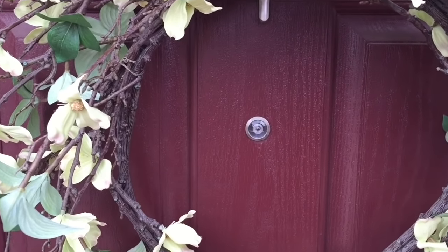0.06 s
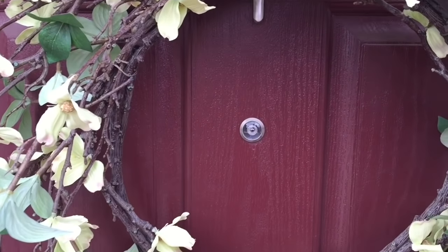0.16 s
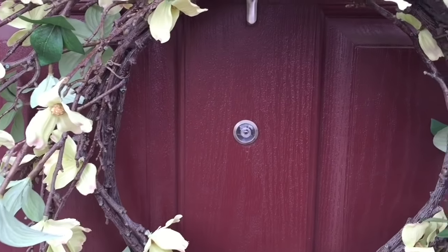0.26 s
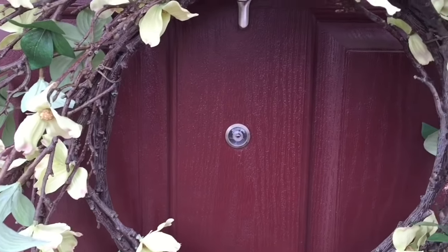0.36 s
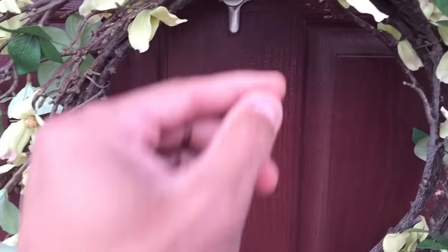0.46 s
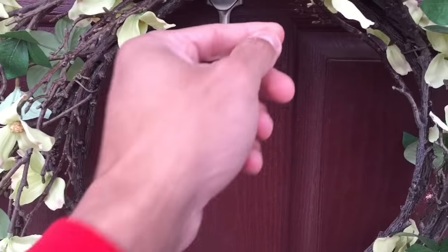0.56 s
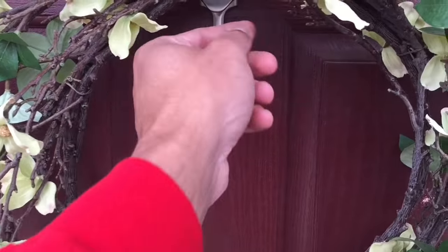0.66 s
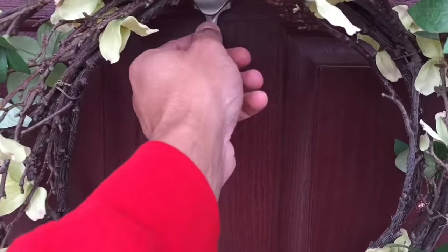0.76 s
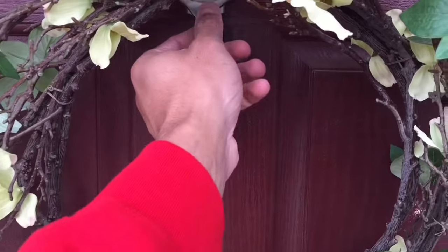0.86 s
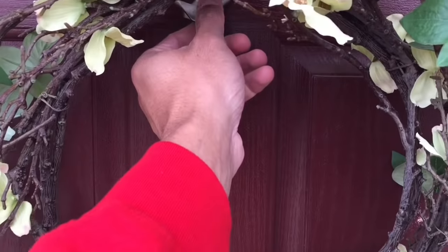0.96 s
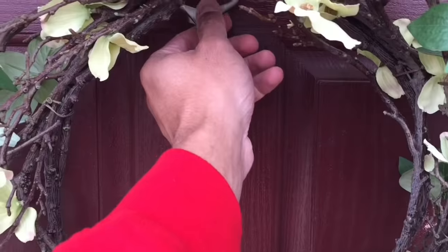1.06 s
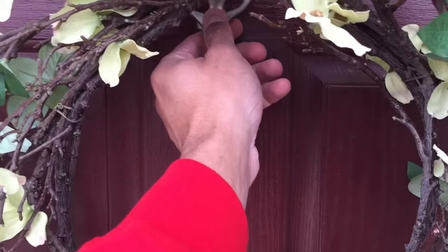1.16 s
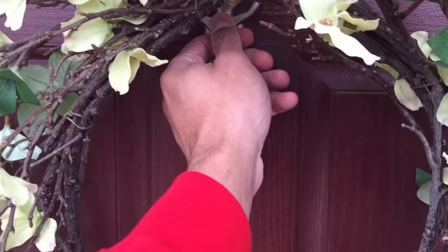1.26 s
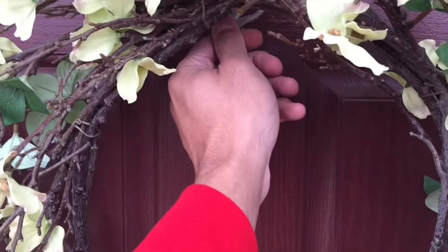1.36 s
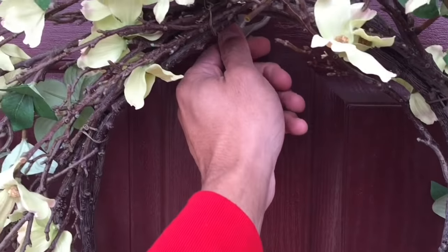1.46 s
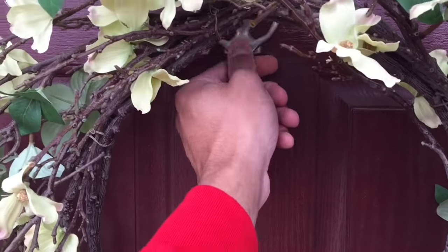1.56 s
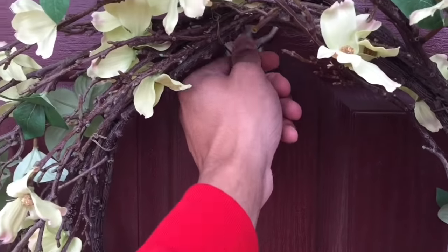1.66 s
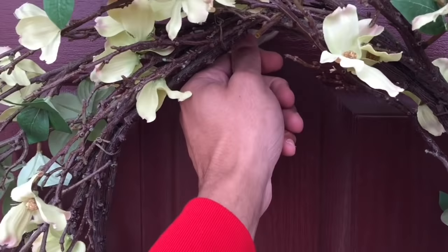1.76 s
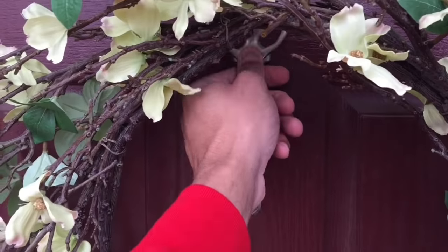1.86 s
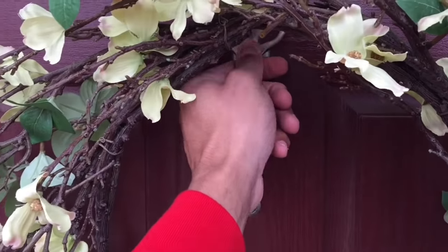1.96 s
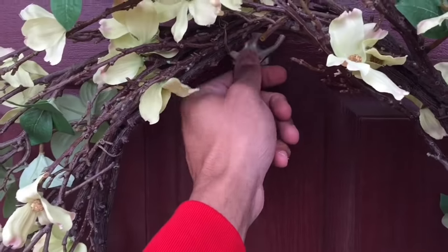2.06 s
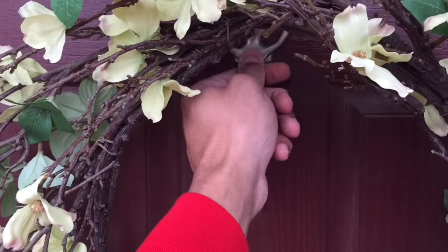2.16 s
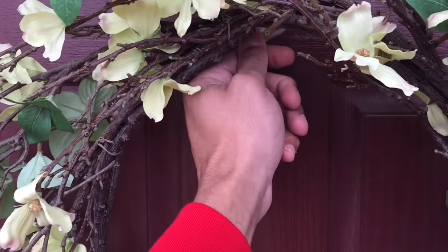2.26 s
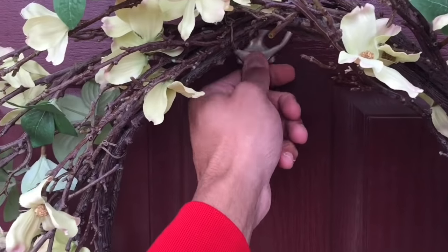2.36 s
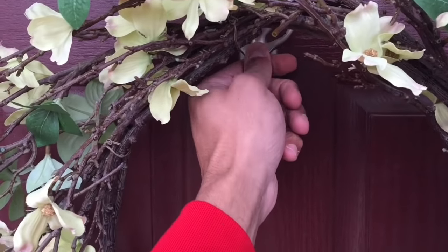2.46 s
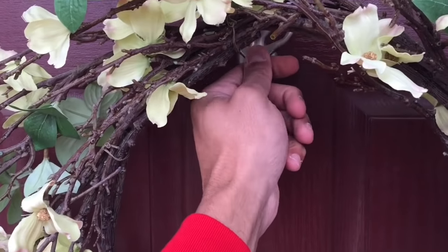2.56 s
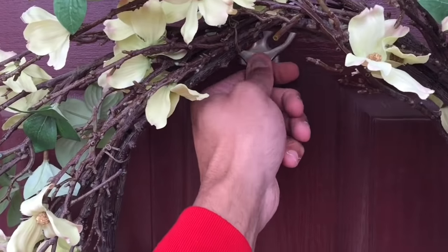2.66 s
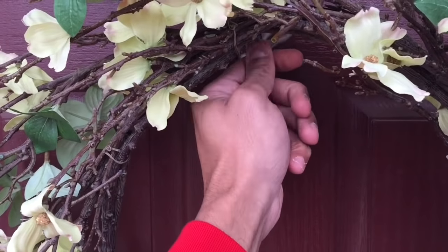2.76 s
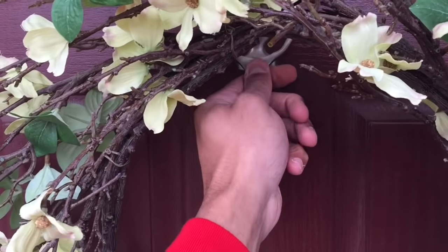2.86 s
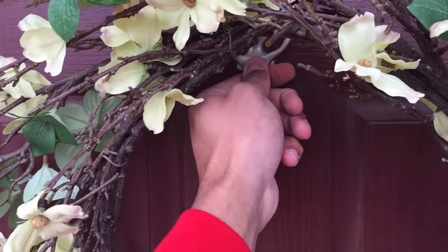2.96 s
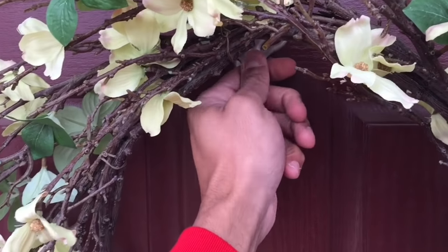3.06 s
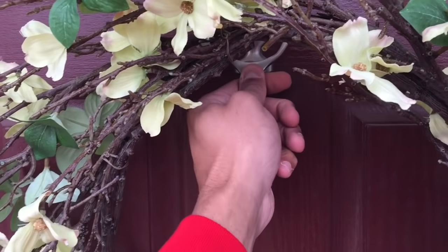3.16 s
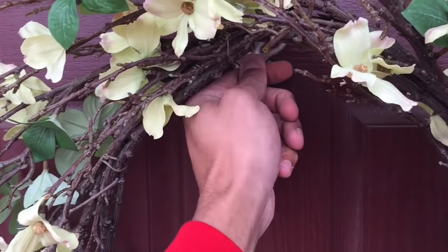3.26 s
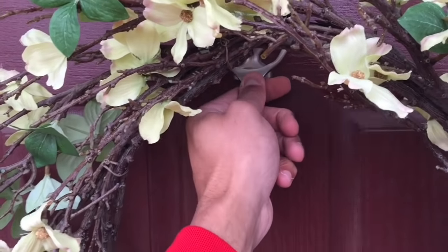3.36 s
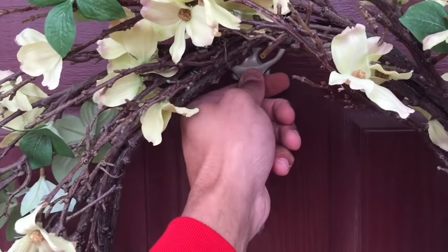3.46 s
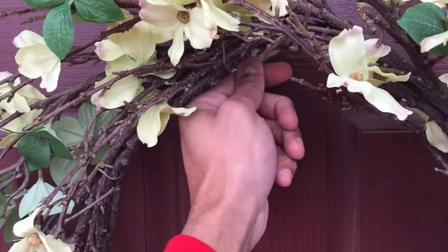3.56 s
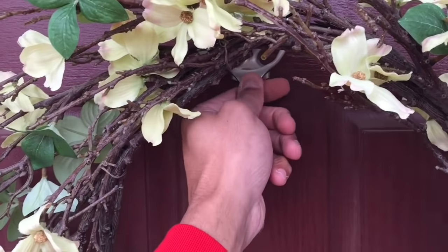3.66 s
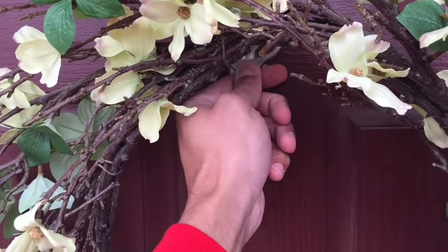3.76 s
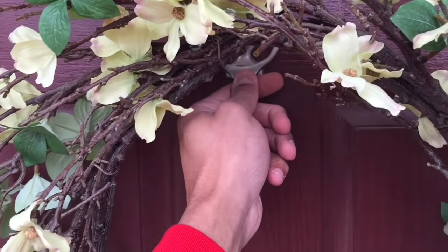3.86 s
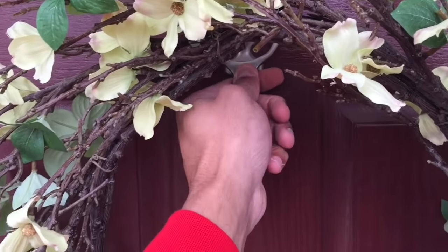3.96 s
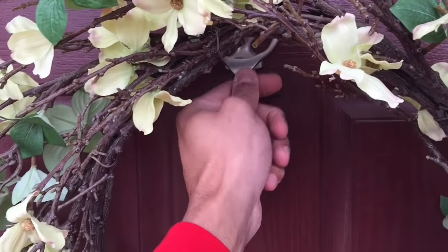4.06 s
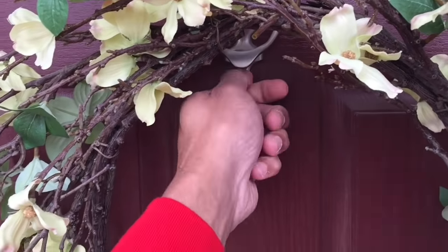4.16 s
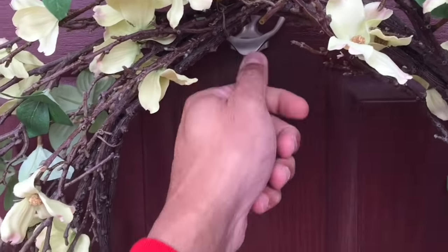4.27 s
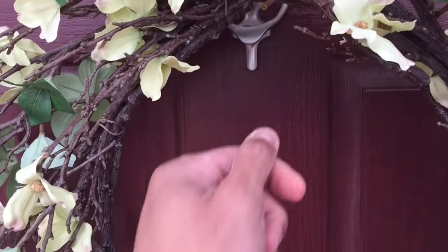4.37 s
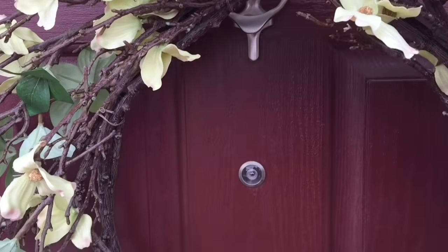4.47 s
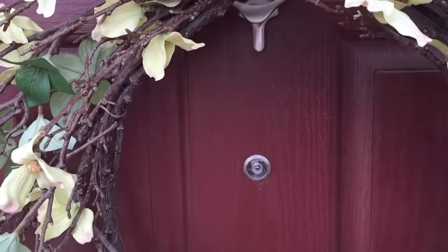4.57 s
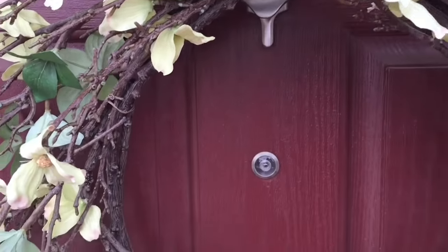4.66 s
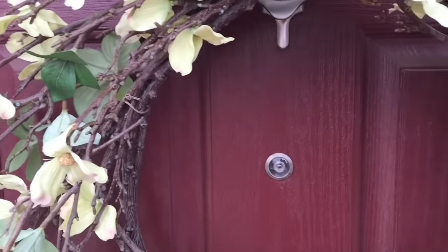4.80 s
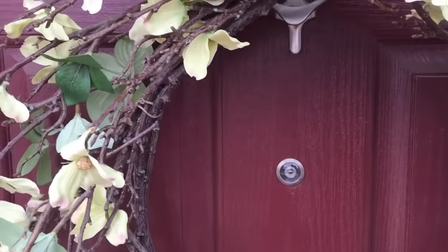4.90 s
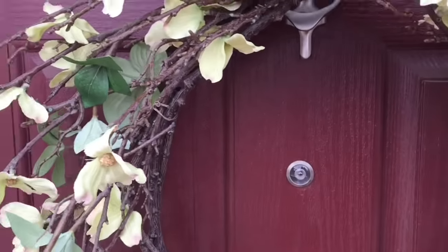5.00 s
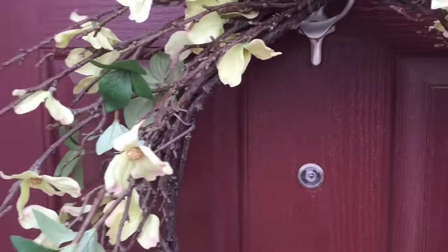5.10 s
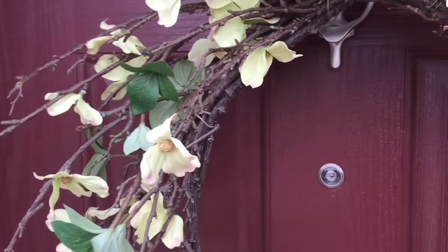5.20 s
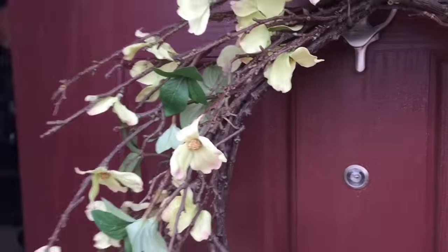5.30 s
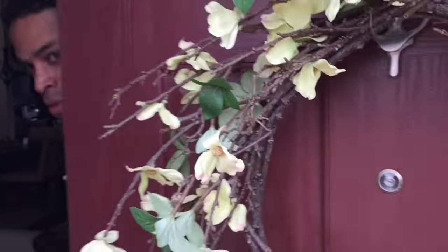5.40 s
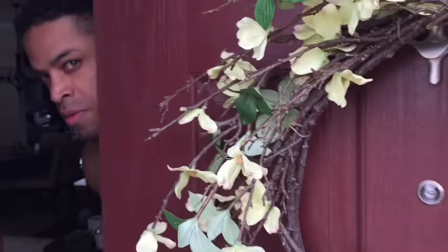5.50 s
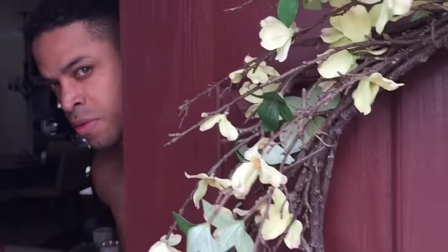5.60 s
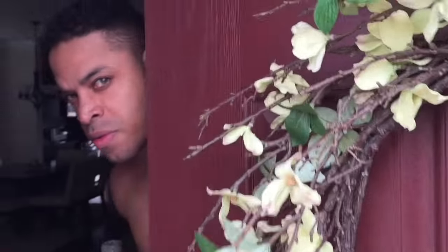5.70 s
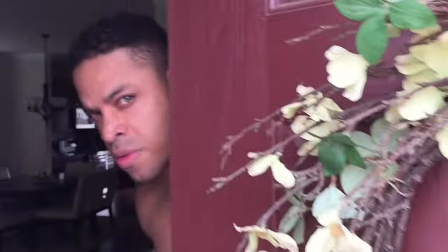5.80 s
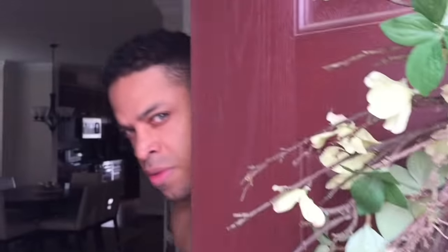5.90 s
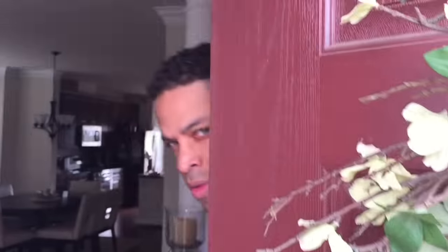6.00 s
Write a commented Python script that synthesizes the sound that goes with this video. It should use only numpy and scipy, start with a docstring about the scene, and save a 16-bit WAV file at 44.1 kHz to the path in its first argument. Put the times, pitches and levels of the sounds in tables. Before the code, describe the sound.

Very near microphone, dry porch sound. Soft low street hum and faint bumps come first, then light metal touches and a steady rush of loud knocker blows, about four a second, bright cracks over a hollow door body, the hardest slightly flattened by overload. They stop; handle and latch click, the door unsticks with a grainy rustle, and two wavering hinge squeaks end it.

```python
"""At a front door, close up: a small metal knocker is rapped fast, hard blows with bounces and arm rattle.
Then the door opens: latch clicks, a peeling seal, a shaking twig wreath and a squeaking hinge.
A distant street hums under it all. Blows ring tuned metal and door modes under a noise crack; rustle is
grainy noise, squeaks are wavering sines, bumps are low narrow noise and the street is shaped noise.
The hardest blows overload: they flatten against a soft ceiling."""
import sys
import numpy as np
from scipy import signal
from scipy.io import wavfile
from scipy.ndimage import uniform_filter1d

SR = 44100
rng = np.random.default_rng(int(sys.argv[2]) if len(sys.argv) > 2 else 0)


def file_out(sig):
    """Save sig as 16-bit WAV at sys.argv[1]."""
    # one column per channel
    cols = np.atleast_2d(sig).T
    # limit, then scale
    lim = np.clip(cols, -1, 1)
    pcm = np.round(lim * 32767).astype(np.int16)
    wavfile.write(sys.argv[1], SR, pcm)


N = 266364
EDGE_HZ = 16000  # upper band limit of the scene
SOFT_START = .2  # chatter swells in with this share of its time
FIRM_CHATTER_S, LOOSE_CHATTER_S = 0.00085, 0.0039


def amp(db):
    """Turns dB into a linear gain; amp(2 * db) is the matching power."""
    return 10 ** (np.asarray(db) / 20)


def evened(x):
    """Scales a signal to rms 1."""
    return x / np.sqrt(np.mean(x ** 2) + 1e-20)


def read(points, hz):
    """Reads a (frequency, value) curve along a log frequency axis."""
    f, value = np.transpose(points)
    return np.interp(np.log(hz + 1), np.log(f + 1), value)


def add(mix, s, sound):
    """Lays a sound into the mix at s seconds, cut at the end of the mix."""
    part = mix[round(s * SR):][:len(sound)]
    part += sound[:len(part)]


def noise(length, size, field_db):
    """Noise from random short-time spectra whose level is field_db(Hz, s)."""
    hop = size // 4
    hz = np.fft.rfftfreq(size, 1 / SR)[:, None]
    t = np.arange(length // hop + 5) * hop / SR
    a, b = rng.standard_normal((len(t), len(hz), 2)).T
    spectra = (a + 1j * b) * amp(field_db(hz, t))
    return signal.istft(spectra, nperseg=size, noverlap=size - hop)[1][:length]


def modes(table):
    """Half a second of dying sines, one per (Hz, dB, t60 s) row."""
    t = np.arange(SR // 2) / SR
    return sum(amp(db - 60 * t / t60) * np.sin(2 * np.pi * hz * t) for hz, db, t60 in table)


def unit(response):
    """Scales a response to rms 1 over its first 8 ms."""
    return response / np.sqrt(np.mean(response[:350] ** 2))


def band(x, lo_hz, hi_hz):
    """Keeps the band between two frequencies."""
    return signal.sosfilt(signal.butter(2, [lo_hz, hi_hz], "bandpass", fs=SR, output="sos"), x)


# background: distant street and hiss, as (frequency [Hz], relative level [dB per Hz])
STREET = [(15, -49.5), (25, -25.5), (76, 7), (117, -18), (212, -6.5), (242, -17.5), (309, -6), (463, -19.5),
          (545, -17), (714, -13.5), (818, -16), (1160, -15), (1260, -17), (2610, -38), (16000, -55)]
STREET_DB = -46  # overall rms


def street():
    """Distant traffic and microphone hiss: steady coloured noise in faint drifting patches."""
    grid = rng.standard_normal((N // 512 + 5, 1025))
    smooth_in_time = uniform_filter1d(grid, 10, 0)
    patchy_db = 1.6 * evened(uniform_filter1d(smooth_in_time, 8, 1)).T
    hum = noise(N, size=2048, field_db=lambda hz, t: read(STREET, hz) + patchy_db)
    return amp(STREET_DB) * evened(hum)


# low bumps of hand and door, as (time at full swell [s], level [dB], centre [Hz], t60 [s])
BUMPS = [(.56, -43.5, 101.5, 0.71), (.73, -37.5, 98, 0.54), (.854, -29.5, 141, 0.16),
         (1.219, -46, 111, 0.34), (1.289, -40, 85.5, 0.14), (1.67, -24.5, 138.8, 0.33),
         (1.976, -23, 166.1, 0.38), (2.225, -21.5, 147.6, 0.27), (2.484, -30, 187.7, 0.34),
         (2.641, -32.5, 101, 0.27), (2.8, -35, 200.6, 0.27), (2.961, -28, 108, .15),
         (3.019, -21, 155, 0.24), (3.275, -23.5, 184.6, 0.32), (3.51, -25, 184.3, 0.42),
         (3.79, -33, 190.2, 0.45), (4.015, -21.5, 154.6, 0.32), (4.22, -16, 129.6, 0.24),
         (4.334, -16.5, 84.3, 0.24), (4.525, -30, 107, 0.17), (4.681, -29, 193.5, 0.23),
         (4.801, -42, 91.3, .8), (4.95, -24, 72, .4), (5.529, -38.5, 97, 0.64), (5.59, -27, 200, .2),
         (5.65, -29, 150, .3), (5.735, -32.5, 154.8, 0.31), (5.95, -33, 188.7, 0.78)]
BUMP_RISE_S = 0.0151


def bumps():
    """A broad low resonance, shaken at random: a quick swell, then a dying rumble."""
    out, t = np.zeros(N), np.arange(SR // 2) / SR
    shakes = rng.standard_normal((len(BUMPS), 2, len(t)))
    for (s, db, hz, t60), shake in zip(BUMPS, shakes):
        # two smoothing stages keep the shake close around the centre
        for width_hz in (80, 160):
            shake = signal.lfilter([1], [1, -np.exp(-np.pi * width_hz / SR)], shake)
        a, b = shake
        rumble = evened(a * np.cos(2 * np.pi * hz * t) + b * np.sin(2 * np.pi * hz * t))
        rise = np.minimum(t / BUMP_RISE_S, 1) ** 2
        fall = amp(db - 60 * np.maximum(t - BUMP_RISE_S, 0) / t60)
        add(out, s - BUMP_RISE_S, rise * fall * rumble)
    return out


# short gliding squeak strands, one of them an octave above the hinge squeak, as
# (start time [s], length [s], first pitch [Hz], last pitch [Hz], level [dB])
PEEPS = [(5.44, .08, 1900, 1880, -55), (5.59, 0.059, 1890, 1900, -37), (5.655, .03, 1200, 1100, -38),
         (5.642, .12, 2670, 2650, -49), (5.715, .03, 1900, 1880, -49), (5.755, 0.067, 4400, 4000, -49),
         (5.76, .06, 1750, 1600, -50)]


def peep(start, length, first_hz, last_hz, db):
    """A brief gliding squeak strand beside the long ones, wavering in pitch and flickering in level."""
    count = round(length * SR)
    waver, flutter = (evened(uniform_filter1d(v, size=220)) for v in rng.standard_normal((2, count)))
    glide_hz = np.linspace(first_hz, last_hz, count)
    turn = 2 * np.pi * np.cumsum(glide_hz * (1 + .007 * waver)) / SR
    return start, amp(db + 2.9 * flutter) * np.sin(turn) * np.hanning(count)


# two long hinge squeaks, each as (time [s], slip rate [Hz], level [dB], overtone level [dB])
SQUEAKS = [
    [(5.455, 2665, -54, -76), (5.49, 2606, -45.5, -70), (5.52, 2510, -36, -68), (5.56, 2500, -41, -66),
     (5.6, 2444, -36, -64), (5.68, 2470, -48, -54), (5.71, 2450, -34, -57), (5.73, 2400, -33, -54)],
    [(5.77, 2625, -42, -76), (5.79, 2452, -39.5, -72), (5.815, 2320, -37.5, -62), (5.84, 2195, -55, -60),
     (5.86, 2145, -47, -64), (5.89, 2150, -44, -61), (5.92, 2124, -51, -61), (5.94, 2170, -37, -58)],
]
# multiples 2 to 5 of the slip rate, as (relative level [dB])
OVERTONES_DB = [0, -5, -15, -9]
# multiples 1, 2 and 4 of a third of the slip rate, as (relative level [dB])
THIRDS_DB = [1, -8, -12]
THIRD_DB = -51.  # steady fader for the thirds while the slip tone moves
THIRD_HZ, THIRD_DB_PER_HZ = 2350, 2  # above this rate the thirds fade out, this steeply


def squeak(rows):
    """Fast, uneven stick-slip in the hinge pin; at slower rates every third slip is stronger."""
    s, *columns = np.transpose(rows)
    t = np.arange(s[0], s[-1], 1 / SR)
    hz, db, over_db = (np.interp(t, s, c) for c in columns)
    waver, flutter, catch = (evened(uniform_filter1d(v, size=220)) for v in rng.standard_normal((3, len(t))))
    turn = 2 * np.pi * np.cumsum(hz * (1 + .007 * waver)) / SR
    # a slower slip is softer: its upper overtones fade
    softening_db = np.maximum(2400 - hz, 0) / 15
    over = np.zeros(len(t))
    for k, d in enumerate(OVERTONES_DB):
        multiple = k + 2
        over += amp(d - k * softening_db) * np.sin(multiple * turn) * (hz * multiple < EDGE_HZ)
    thirds = sum(amp(d) * np.sin(2 ** k * turn / 3) for k, d in enumerate(THIRDS_DB))
    third_db = THIRD_DB - THIRD_DB_PER_HZ * np.maximum(hz - THIRD_HZ, 0)
    tone = amp(db) * np.sin(turn)
    tone += amp(over_db + 2.5 * catch) * over
    tone += amp(third_db) * thirds
    return s[0], np.sqrt(2) * amp(2.16 * flutter) * tone * signal.windows.tukey(len(t), .15)


RING_SLOPE = .85  # dB of metal ring per dB of blow: light contacts ring more than they crack


def forces(table):
    """Each contact is a first click and a burst of chatter, felt by the metal and, by its share, the door."""
    chattering, pushing, t = np.zeros(N), np.zeros(N), np.arange(SR // 30) / SR
    grits = rng.standard_normal((len(table), len(t)))
    for (s, db, push_db, _, chatter), grit in zip(table, grits):
        fading = np.exp(-t / chatter) * (1 - np.exp(-t / (SOFT_START * chatter)))
        burst = 0.84 * grit * fading / np.linalg.norm(fading)
        burst[0] += FIRM_CHATTER_S / chatter  # shorter chatter, stronger first click
        add(chattering, s, amp(RING_SLOPE * db) * burst)
        add(pushing, s, amp(db + push_db) * burst)
    return chattering, pushing


def ticks(table, sharp):
    """The first instant of a clean contact is a bright noise tick; long chatter hides it."""
    out, t = np.zeros(N), np.arange(SR // 300) / SR
    grits = rng.standard_normal((len(table), len(t)))
    for (s, db, _, treble_db, chatter), grit in zip(table, grits):
        clean = sharp / (sharp + chatter)
        add(out, s, amp(db + .8 * treble_db) * clean ** 2 * grit * np.exp(-t / 0.00045))
    return band(out, 1700, 22000)


# dying speed of dense modes and porch before the per-source scaling, as (frequency [Hz], base t60 [s])
DYING = [(100, 0.35), (260, 0.34), (700, 0.15), (1840, 0.099), (4850, 0.057), (12800, 0.065)]


def dense(hz, t, table, colour, hurry, porch_db):
    """Level of modes too close to tell apart: each band dies at its own speed, then the porch echoes on."""
    power = np.full((len(hz), len(t)), 1e-30)
    low = 1 / (1 + (hz / 1000) ** 4)
    height = np.clip(np.log2((hz + 1) / 2400) / 2.16, .12, 1.3)  # how fully the treble setting bites
    t60 = read(DYING, hz)
    for s, db, push_db, treble_db, chatter in table:
        window = (t >= s) & (t < s + .3)
        after = t[window] - s
        fall_db = 60 * after / t60
        held_db = np.maximum(fall_db - 60 * chatter / t60, 0)  # chatter keeps the modes fed
        share = low * amp(2 * push_db) + (1 - low) * amp(2 * treble_db * height)  # soft contacts are dull
        direct = amp(-2 * hurry * held_db)
        porch = amp(2 * (porch_db - 0.41 * fall_db))
        swell = 1 - np.exp(-(after + .0003) / (SOFT_START * chatter + 1e-5))
        power[:, window] += amp(2 * (db + read(colour, hz))) * share * (direct + porch) * swell
    return 10 * np.log10(power)


# handle, latch, seal and twigs, as (time [s], relative click level [dB], lows re click [dB],
# treble re click before weighting [dB], chatter time [s])
LATCH = [(4.4732, -39, -9, -27, 0.0034), (4.491, -38, -8, -28, 0.0043), (4.5033, -27, -6, -25, 0.0045),
         (4.6633, -22, 9.5, -8, 0.0075), (4.7633, -43, -8, -33, 0.0044), (4.809, -39.5, -8, -27, 0.005),
         (4.9386, -29, 2, 6.5, 0.0036), (4.949, -25.5, -19, -15, 0.004), (4.959, -28.5, -19, 4, 0.0005),
         (4.967, -28, -15, 3, 0.00044), (5.004, -22.5, -4, -13, 0.00081), (5.0657, -27.5, 8.5, 4, 0.0021),
         (5.074, -32.5, -8, 6, 0.003), (5.0886, -38, -2, -6, 0.004), (5.126, -35.5, 8, -13, 0.00061),
         (5.1633, -27.5, -2, -15, 0.0034), (5.225, -40.5, -5.5, -18.5, 0.004),
         (5.355, -37.5, -2, -17, 0.0051), (5.485, -40, -15, -28, 0.0052), (5.589, -28, 1.5, -16, 0.00057),
         (5.645, -44, 5, 7.5, 0.004), (5.667, -30, 3, -25, 0.005), (5.747, -32.5, -13, -13.5, 0.006),
         (5.967, -38, 0, -26, 0.0043)]
# tone of the clicks, as (frequency [Hz], relative level [dB per Hz])
LATCH_COLOUR = [(60, -32), (200, -6.5), (600, 10), (1200, -4), (2300, 4.5), (4000, -4), (8000, -7.5),
                (16000, -17)]
CLICK_DB = -11.5
# rustle bursts of seal and wreath, as (start time [s], hold [s], level [dB], treble re level [dB])
RUSTLE = [(4.948, 0.066, -34.5, -5), (5.071, 0.052, -36, -12.5), (5.325, 0.034, -48, -12.5),
          (5.589, 0.021, -35.5, -13), (5.661, .012, -37, -18.5), (5.748, 0.012, -42, -17),
          (5.802, 0.26, -53, -12), (5.2, .8, -64, -3)]
RUSTLE_RISE_DB_PER_S, RUSTLE_FALL_DB_PER_S = 700., 249


def opening():
    """Dry clicks of handle, latch and twigs nudge the door leaf, over a grainy rustle of seal and wreath."""
    clicks = noise(N, size=128, field_db=lambda hz, t: dense(hz, t, LATCH, LATCH_COLOUR, 1.5, -18.))
    _, pushing = forces(LATCH)
    body = signal.oaconvolve(pushing, unit(modes(DOOR)))[:N]
    # about 300 random grains a second stand out of a fine hiss
    sizes = rng.exponential(1, N) * (rng.random(N) < 300 / SR)
    grains = rng.standard_normal(N) * (1 + 35. * uniform_filter1d(sizes, size=60))
    s, hold, level_db, treble_db = np.transpose(RUSTLE)[:, :, None]
    t = np.arange(N) / SR
    rise_db = RUSTLE_RISE_DB_PER_S * np.maximum(s - t, 0)
    fall_db = RUSTLE_FALL_DB_PER_S * np.maximum(t - s - hold, 0)
    level = amp(level_db - rise_db - fall_db)
    treble = (level * amp(treble_db)).sum(0)
    rustle = level.sum(0) * evened(band(grains, 170, 2700))
    rustle += treble * evened(band(grains, 3000, 13000))
    return amp(CLICK_DB) * clicks + amp(-14.) * body + rustle


# the loose arm rubbing and buzzing under the fingers, as (time [s], level [dB])
FIDGET = [(1.3, -75), (1.7, -66), (1.95, -47.5), (2.15, -61), (2.5, -51), (3.2, -61), (3.55, -51),
          (4.2, -48.5), (4.449, -61), (4.95, -64.5)]


def fidget():
    """Grainy rubbing that keeps the knocker's modes faintly alive between contacts."""
    s, db = np.transpose(FIDGET)
    unevenness = evened(uniform_filter1d(rng.standard_normal(N), size=200))
    grains = rng.standard_normal(N) * amp(6.2 * unevenness)
    ringing = evened(signal.oaconvolve(grains, modes(METAL))[:N])
    rubbing = evened(band(band(grains, 1300, 3000), 1200, 3100))
    level_db = np.interp(np.arange(N) / SR, s, db, left=-120, right=-120)
    return amp(level_db) * (ringing + 0.59 * rubbing)


# contacts of the knocker, as (time [s], relative blow level [dB], push into the door re blow [dB],
# treble re blow before weighting [dB])
KNOCKS = [(1.437, -24.5, -8, -33), (1.457, -30, -13, -43), (1.5478, -38.5, -2.5, -44),
          (1.6489, -13.5, -7.5, -6), (1.6654, -5.5, -8.5, -5), (1.7497, -17, -9.5, -7),
          (1.8569, -27, -11, -24), (1.9008, -25, -6.5, -35), (1.922, -17.5, -4.5, -13.5),
          (1.9719, -1, -8.5, -2), (2.037, -21, -22, -9), (2.0619, -28, -3, -31), (2.1928, -30.5, -5, -38),
          (2.2058, -18.5, -17, -17), (2.2217, -0.5, -9, -5), (2.3213, -20.5, -4.5, -6),
          (2.3324, -19.5, -6, -37), (2.3968, -37.5, -1, -13), (2.4052, -28.5, -8, -24),
          (2.4487, -30, -3.5, -19.5), (2.4812, -0.5, -9, -5), (2.5669, -23, -3, -6.5),
          (2.572, -17.5, -16.5, -32), (2.659, -20.5, -29, -10), (2.725, -19.5, -16, -14.5),
          (2.7385, 0, -12.5, -5.5), (2.809, -19.5, -6, -13), (2.9142, -18.5, -19, -8.5),
          (2.9522, -34, -2.5, -25), (2.981, -18.5, -11.5, -13), (3.0162, -2.5, -9.5, -3),
          (3.1009, -29.5, -5, -14.5), (3.2428, -20.5, -5, -13.5), (3.2624, -14, -9.5, -18),
          (3.2701, -1.5, -11, -1.5), (3.3229, -32.5, 5, -2), (3.3414, -17.5, -7.5, -5.5),
          (3.4468, -30.5, -10, -26), (3.49, -27.5, -13.5, -8), (3.4964, -25.5, -1.5, -16),
          (3.5063, -0.5, -8.5, -4), (3.602, -19.5, -6.5, -10), (3.7006, -19, -17, -10.5),
          (3.7673, -30, -8, -21), (3.7773, -21, -10, 0), (3.7841, -1.5, -8.5, -4), (3.854, -27, -4, -15.5),
          (3.8757, -28, -5.5, -11.5), (3.925, -26, -20, -27), (3.9975, -26.5, -13.5, -6.5),
          (4.013, -1.5, -11, -6), (4.1001, -23, -5.5, -5), (4.1346, -32, 2.5, -29.5),
          (4.2069, -17, -13, -6.5), (4.215, 2, -12, -5), (4.3121, -12, -16, 0), (4.3237, -17, -17, -11),
          (4.3617, -32, -15, -22)]
FIRM_DB, LOOSE_DB = -6.5, -8.5  # a firm blow seats at once, a light one chatters


def contacts():
    """The knocks with their chatter time: short for firm blows, the same longer one for all light ones."""
    chatter = [LOOSE_CHATTER_S, FIRM_CHATTER_S]
    return [(*row, np.interp(row[1], [LOOSE_DB, FIRM_DB], chatter)) for row in KNOCKS]


# the knocker and its plate, as (frequency [Hz], relative level [dB], t60 [s])
METAL = [(1296, -7.5, 0.085), (1663, -9, 0.078), (2015, -0.5, 0.052), (2061, 5.5, 0.033),
         (2270, -14, 0.086), (2790, -7, 0.02), (3200, -15, 0.047)]
# the door leaf, as (frequency [Hz], relative level [dB], t60 [s])
DOOR = [(67.6, -22.5, 0.72), (83, -5, .35), (167, -12, 0.15), (209.6, -7, 0.34), (271.3, 2.5, 0.23),
        (397.6, -6.5, 0.18), (458.2, 5, 0.12), (546.3, 5, 0.08), (636.7, -1.5, 0.12), (851, -2.5, 0.13),
        (1120, -12, 0.056)]
# dense modes of the crack, as (frequency [Hz], relative level [dB per Hz])
DENSE = [(60, -28), (110, -4), (470, 4), (770, -2.5), (1400, -7), (2050, 0), (2600, -6.5), (4200, -4),
         (5200, -8), (9200, -12.5), (11200, -10.5), (16000, -17.5)]
CRACK_DB = -9.5
# one high mode of the loose arm singing on after a contact, as (time [s], pitch [Hz], level [dB], t60 [s])
SINGS = [(2.916, 10080, -50, .12), (3.017, 11180, -12, 0.057), (3.342, 10080, -42, .1),
         (3.705, 14640, -43.5, .08), (4.215, 10080, -39.5, .25)]


def knocker():
    """Metal on metal, bolted to the door leaf: contacts ring both, with a noisy crack of dense modes."""
    knocks = contacts()
    chattering, pushing = forces(knocks)
    metal = band(signal.oaconvolve(chattering, unit(modes(METAL)))[:N], 900, 3800)
    leaf = signal.oaconvolve(pushing, unit(modes(DOOR)))[:N]
    crack = noise(N, size=128, field_db=lambda hz, t: dense(hz, t, knocks, DENSE, 1.28, -24.0))
    out = amp(-8.5) * metal + amp(-5.5) * leaf + amp(CRACK_DB) * crack
    for s, *mode in SINGS:
        add(out, s, modes([mode]))
    return out


def scene():
    """Mixes street, bumps, door opening, hinge and knocker into one channel."""
    mix = street() + bumps() + opening() + fidget() + knocker()
    mix += amp(15.5) * ticks(LATCH, 0.0015)
    mix += amp(8.5) * ticks(contacts(), 0.0022)
    for row in PEEPS:
        add(mix, *peep(*row))
    for rows in SQUEAKS:
        add(mix, *squeak(rows))
    return mix[None]


def record(dry):
    """Bass roll-off, a soft ceiling that flattens the hardest blows, then the band limit."""
    dry = signal.sosfilt(signal.butter(3, 42, "highpass", fs=SR, output="sos"), dry)
    capped = dry / (1 + (dry / .9) ** 8) ** (1 / 8)
    lowpass = signal.firwin(121, EDGE_HZ, window=("kaiser", 4), fs=SR)
    return signal.oaconvolve(capped, lowpass[None], "same")


dry = scene()
out = record(dry)
file_out(out)
```